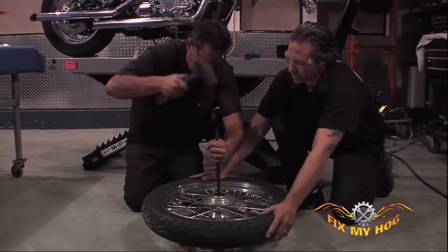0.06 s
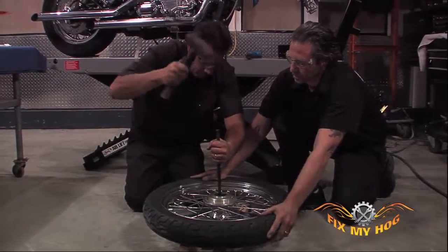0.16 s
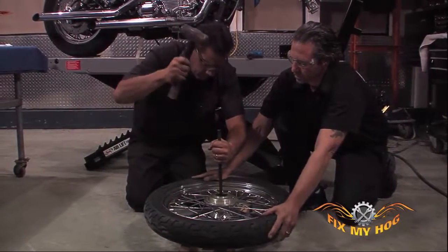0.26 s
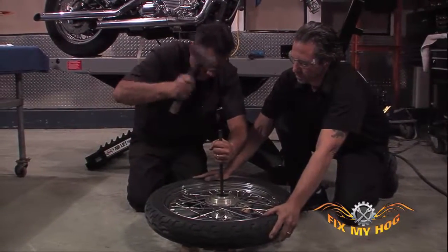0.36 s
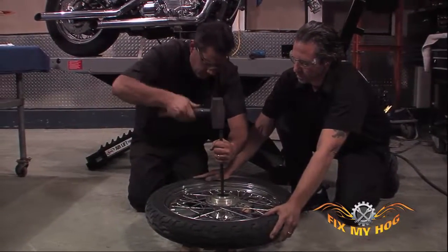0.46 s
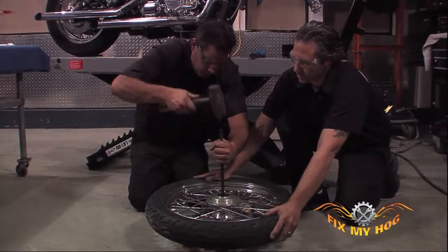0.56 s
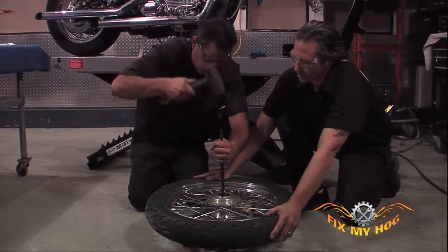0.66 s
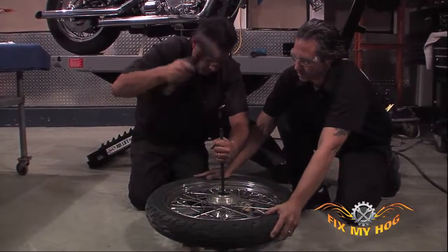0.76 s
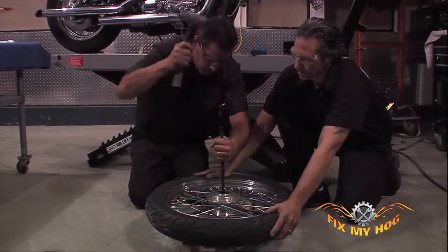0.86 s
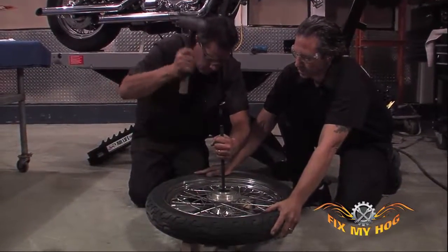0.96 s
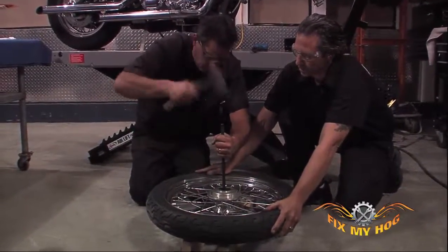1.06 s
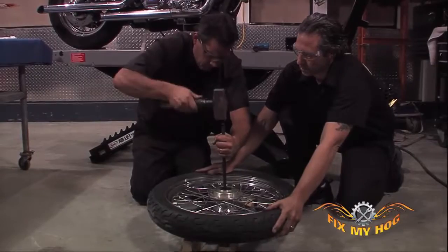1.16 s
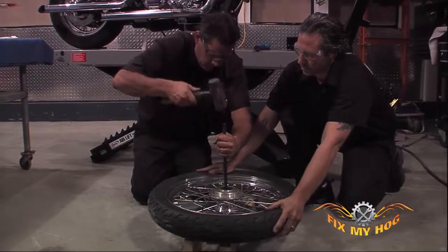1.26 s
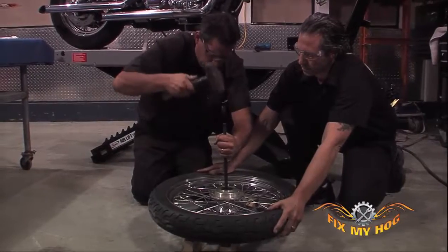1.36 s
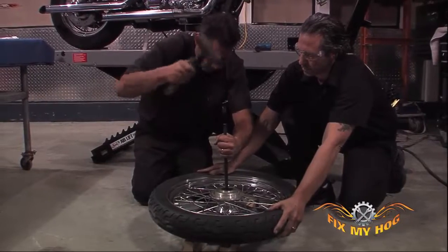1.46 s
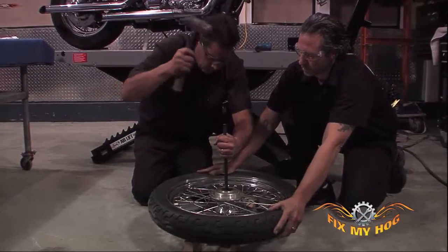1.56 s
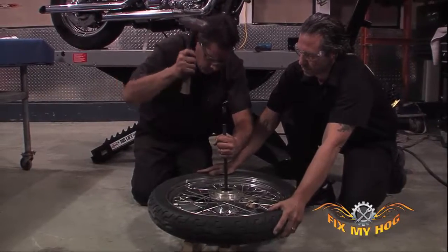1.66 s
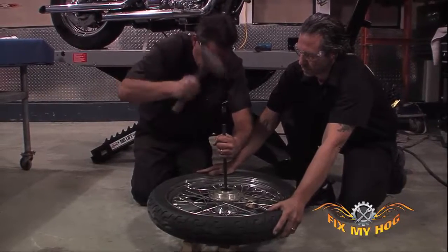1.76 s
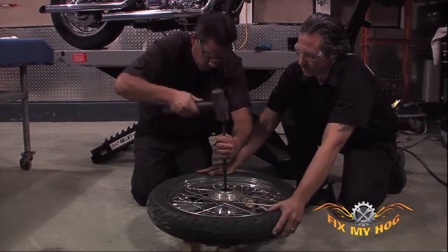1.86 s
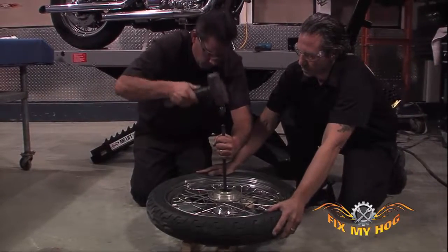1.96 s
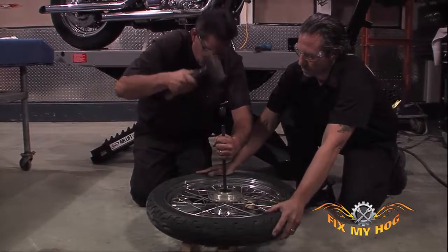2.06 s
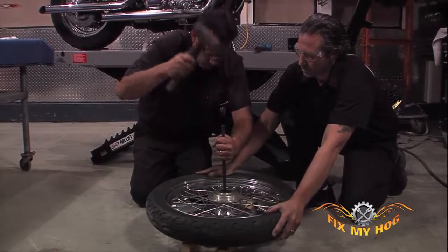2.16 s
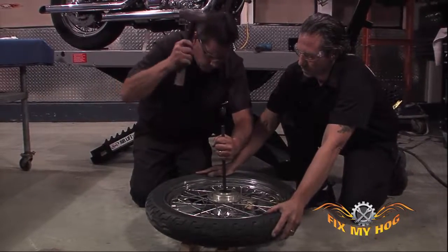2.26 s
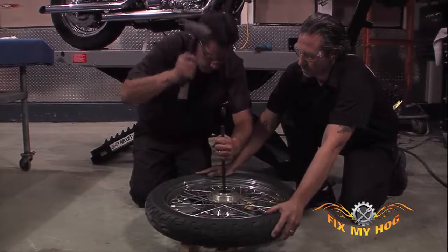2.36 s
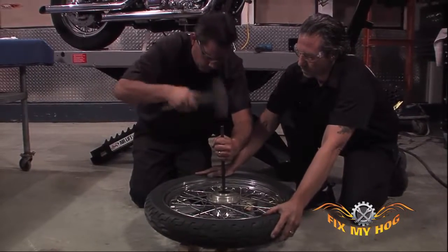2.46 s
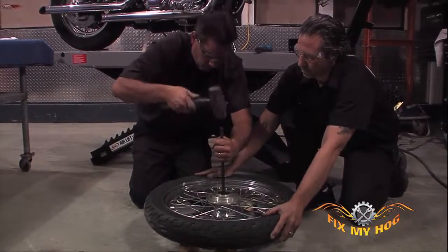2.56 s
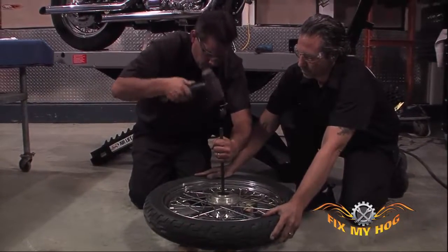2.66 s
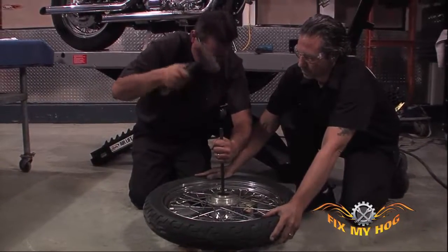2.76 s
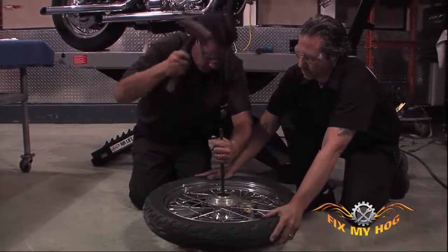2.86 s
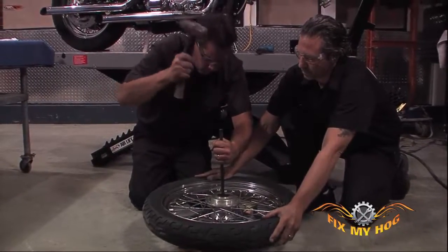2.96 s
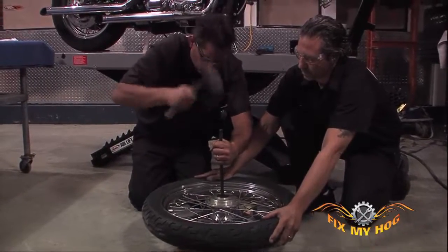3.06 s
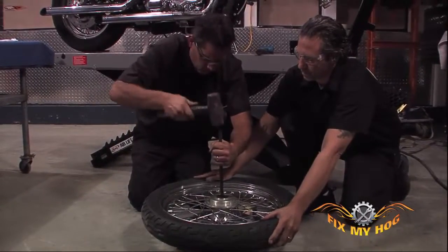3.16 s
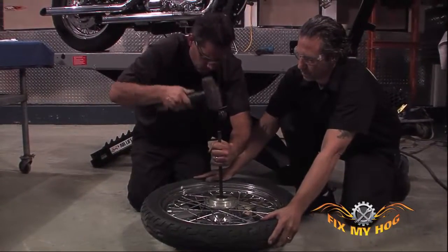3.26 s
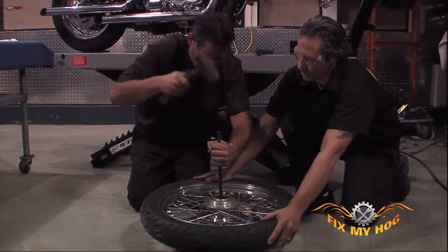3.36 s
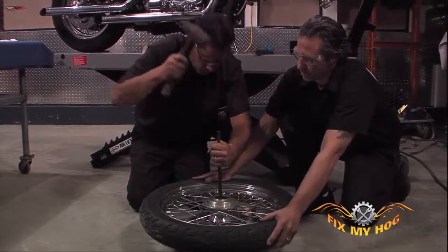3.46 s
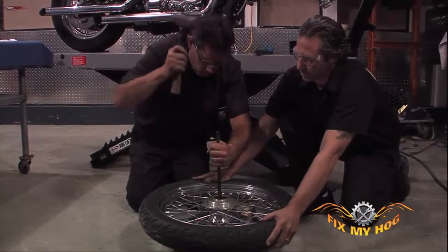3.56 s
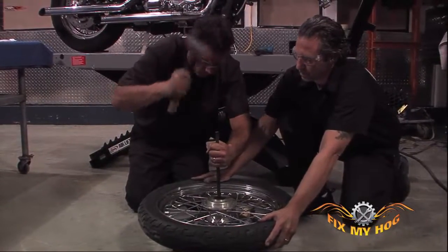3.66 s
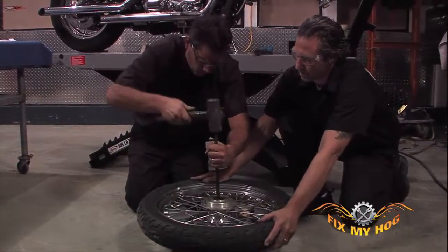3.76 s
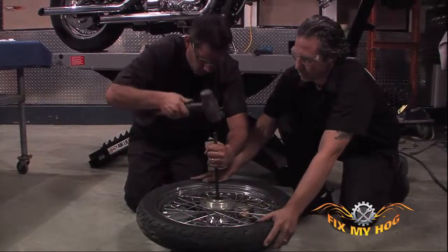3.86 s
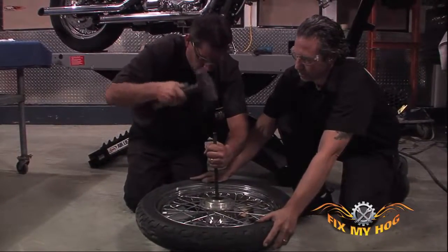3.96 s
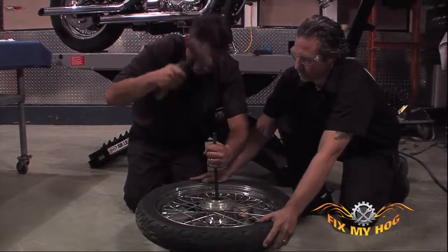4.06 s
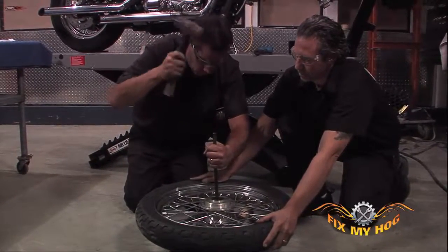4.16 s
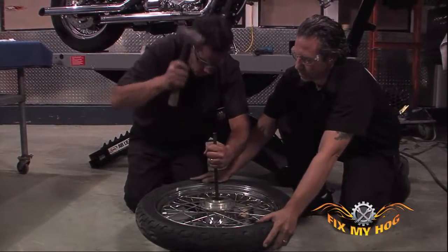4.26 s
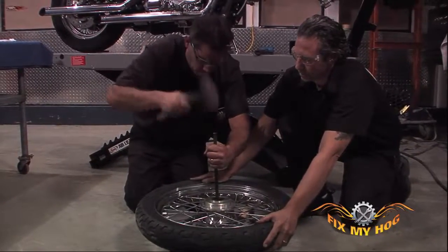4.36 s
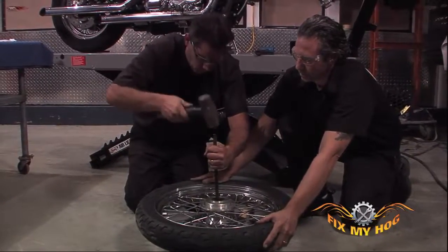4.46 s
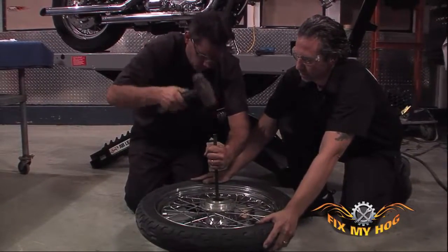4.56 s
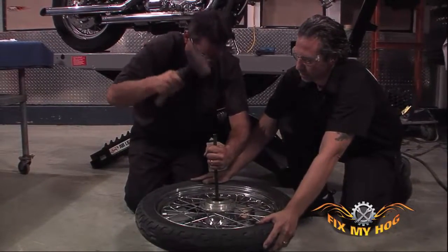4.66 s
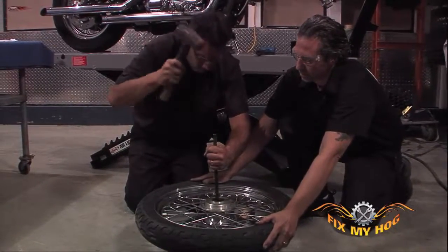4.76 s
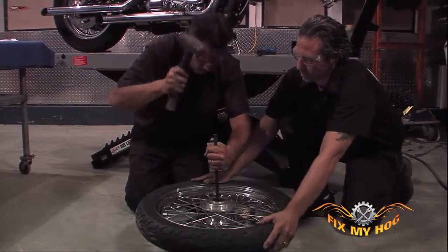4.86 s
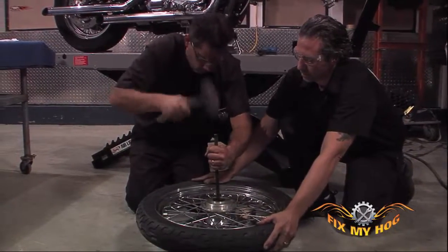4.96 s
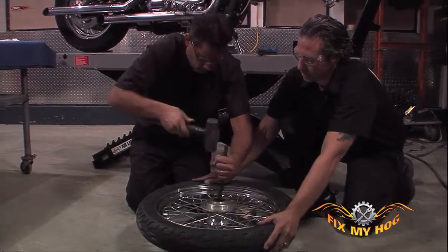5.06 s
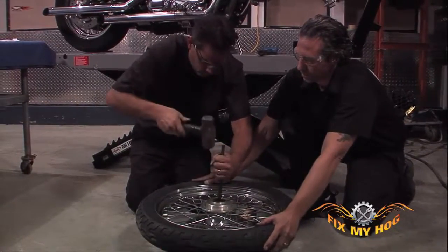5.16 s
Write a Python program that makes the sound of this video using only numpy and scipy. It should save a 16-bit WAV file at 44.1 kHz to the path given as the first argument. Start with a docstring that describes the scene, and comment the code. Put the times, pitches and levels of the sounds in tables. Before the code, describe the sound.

Evenly spaced sharp metal hammer blows with short rattle and thin ringing in a reverberant garage, the last two weaker as the part comes loose.

```python
"""Hammering a bearing out of a wheel

A hammer drives a steel bearing remover into the hub of a spoked wheel lying on a workshop floor.
Each blow is a noise crack, decaying noise clatter and damped modes of wheel and rod, with singing spokes.
The rod's modes change as the bearing slips and comes free; the rod then drops with a second, dull knock.
The hall adds a wall echo and a diffuse tail, over a faint ventilation drone of coloured noise."""
import sys
import numpy as np
from scipy import signal
from scipy.fft import rfft, irfft, next_fast_len
from scipy.io import wavfile

SR = 44100
rng = np.random.default_rng(int(sys.argv[2]) if len(sys.argv) > 2 else 0)


def wrap_up_sound(samples):
    """Save the sound to the file named by the first command line argument, as 16-bit audio."""
    columns = np.atleast_2d(samples).T
    # keep every value between -1 and 1, then stretch to whole-number steps
    tamed = np.clip(columns, -1, 1)
    steps = np.round(tamed * 32767).astype(np.int16)
    wavfile.write(sys.argv[1], SR, steps)


N = 229871  # samples
TOP_HZ = 10450  # upper band limit of the crack and of the recorder

# hammer blows: start_s, level_db, hollow_knock_db, spoke_song_db, seat (how the rod sits)
BLOWS = [(-.15, -0.5, 3, -7, "wedged"), (0.4913, 1, 2.5, -6.5, "wedged"), (1.1363, 2, -4.5, -2, "wedged"),
         (1.871, 0, 4, -3, "wedged"), (2.5194, .5, -2, -10.5, "wedged"), (3.1506, .5, 0, 3, "wedged"),
         (3.7914, -1, 2, 2.5, "wedged"), (4.4381, -3.5, -1, 0.5, "slipping"), (5.0325, -6, -2, 2.5, "free")]


def hammering():
    """Superposition of impulse responses: every blow excites wheel, rod and spokes, then the hall."""
    # modes of the rod for each seat: pitch_hz, level_db (relative), t60_s, swell_s
    wedged_modes = [(3440, -7, .15, .004), (4366, -10, .1, .004), (4522, -8, .1, .004),
                    (5060, 1, .08, .008), (5591, 27, .072, .045), (5578, -21, .65, .02),
                    (6794, 9, .08, .013), (8157, -4, .09, .006), (9970, -8, .08, .003)]
    slipping_modes = [(581, 2, .14, .003), (643, -9, .5, .003), (2546, -2, .13, .003),
                      (3295, -2, .15, .003), (3310, -12, .5, .003), (9577, -2, .08, .002)]
    free_modes = [(2164, 1, .14, .002), (2471, -4, .14, .002), (3470, 17, .045, .003), (3448, 2, .42, .004),
                  (3479, -2, .4, .004), (5017, -9, .15, .002), (8161, -16, .25, .002),
                  (8931, -13, .15, .002), (9970, 0, .08, .002)]
    # how loose the rod sits, by seat: looseness (0 tight, 1 free)
    looseness = {"wedged": 0, "slipping": .55, "free": 1}
    rod_modes = {"wedged": wedged_modes, "slipping": slipping_modes, "free": free_modes}
    rod_db = -23.5
    shortening = 0.27  # share of the clatter's length that a free rod loses

    # a second of lead-in holds the first blow, which is already dying away at the start
    out = np.zeros(N + 2 * SR)
    t = np.arange(SR) / SR
    for start_s, level_db, knock_db, song_db, seat in BLOWS:
        loose = looseness[seat]
        colour = blow_colour(start_s, knock_db, loose)
        knock = wheel(*colour, length=1 - shortening * loose)
        rod = amp(rod_db) * ring(rod_modes[seat], t)
        song = spokes(song_db, t)
        # the rod's thin ring fills the hall less than the wheel's knock does
        echoes = hall(knock + amp(-6) * rod)
        start = round((start_s + 1) * SR)
        out[start:start + SR] += amp(level_db) * (knock + rod + song + echoes)
    return out[SR:SR + N]


def blow_colour(start_s, knock_db, loose):
    """Contact and seating set the spectral balance: boom, thud, knock, clang and treble in dB."""
    # a hollow blow also booms more, by 0.65 dB per dB of knock
    boom_db = -1 + 0.65 * knock_db + 7 * loose
    thud_db = 2 - 5.5 * loose
    clang_db = 0.7
    # the blows brighten by 1.43 dB per second as the bearing is driven out
    treble_db = -1.23 + 1.43 * start_s - 0.5 * loose
    return boom_db, thud_db, knock_db, clang_db, treble_db


def wheel(boom_db, thud_db, knock_db, clang_db, treble_db, length):
    """Impact excitation of a built-up structure: a crack, dense clatter and modes of hub and rim, for 1 s."""
    # dense clatter of spokes and hub: frequency_hz, density_db (per Hz, relative)
    clatter_spectrum = [(25, -21.5), (100, -18), (250, -12), (450, -3), (780, -1), (1300, -7.5), (2000, -5),
                        (3000, -11), (4400, -13), (6000, -16), (8500, -21.5), (10300, -22.5)]
    # decay of the clatter at length 1: frequency_hz, t60_s
    clatter_decay = [(100, 0.18), (700, 0.19), (2000, 0.23), (5000, 0.15), (10000, 0.043)]
    # modes of hub and rim: pitch_hz, level_db (relative), t60_s
    wheel_modes = [(468, -11, .25), (528, -10, .25), (554, -10, .3), (646, -14, .25), (725, -3, .12),
                   (781, -4, .12), (856, -5, .12), (1080, -6, .12), (1420, -6, .11), (1686, -8, .1),
                   (1855, -6, .1), (1997, -10, .22), (2552, -7, .13), (3101, -13, .12)]

    t = np.arange(SR) / SR
    t60s = [(hz, length * t60) for hz, t60 in clatter_decay]
    dense = noise(lambda hz: amp(along(clatter_spectrum, hz)), SR)
    clatter = amp(-14.5) * dying(dense, t60s)
    # loose contacts chatter, so the clatter comes in bursts a few milliseconds long
    chatter_db = 1.8 * noise(lambda hz: (hz > 40) & (hz < 200), SR)
    clatter *= amp(chatter_db)
    body = clatter + amp(-24) * length * ring(wheel_modes, t)

    # how squarely the hammer lands sets the colour
    colour = [(100, 0.0024), (350, boom_db), (680, thud_db),
              (1080, knock_db), (2000, clang_db), (7500, treble_db)]
    body = filtered(body, lambda hz: amp(along(colour, hz)))

    # steel on steel: a few milliseconds of bright crack
    bright = noise(lambda hz: (hz < TOP_HZ) * hz / (hz + 1200), SR)
    crack = amp(-28.5 + treble_db) * bright * np.exp(-(t / 0.0049) ** 2)
    onset = 1 - np.exp(-t / 0.00058)
    return (body + crack) * onset


def ring(modes, t):
    """Modal synthesis: damped sines of slightly new strength each time; a swell time makes a mode build up."""
    pitch_hz, level_db, t60_s, *swell_s = np.transpose(modes)[:, :, None]
    rise = 1 - np.exp(-(t / swell_s[0]) ** 2) if swell_s else 1
    strength_db = level_db + 1.5 * rng.standard_normal(pitch_hz.shape)
    envelope = amp(strength_db - 60 * t / t60_s) * rise
    phase = rng.random(pitch_hz.shape)  # cycles
    return np.sum(envelope * np.sin(2 * np.pi * (pitch_hz * t + phase)), axis=0)


def spokes(song_db, t):
    """Near-degenerate resonators: the spokes, all nearly alike, sing on together after the rod has stopped."""
    decay = amp(song_db - 40.5 - 60 * t / 0.6)  # t60 0.6 s
    rise = 1 - np.exp(-t / 0.0041)
    return decay * rise * band(6810, 120, SR)


def drop():
    """A weaker, softer impact excites less treble: the freed rod lands with one short, dull knock."""
    # colour of the drop by band: boom_db, thud_db, knock_db, clang_db, treble_db
    drop_colour = dict(boom_db=6.5, thud_db=-4, knock_db=-0.5, clang_db=-4.5, treble_db=-11)
    delay_s, level_db = 0.019, -1  # the delay counts from the last blow
    knock = amp(level_db) * wheel(**drop_colour, length=0.3)
    start = round((BLOWS[-1][0] + delay_s) * SR)
    return np.pad(knock + hall(knock), (start, 0))[:N]


def hall(x):
    """Room acoustics: a near wall's delayed reflection, then a diffuse tail by convolution with dying noise."""
    # reverberation of the workshop: frequency_hz, t60_s
    hall_decay = [(100, 0.7), (550, 0.6121), (1200, 0.68), (2500, 0.61), (5000, 0.7141), (7000, .5),
                  (10000, 0.5)]
    # strength of its answer: frequency_hz, level_db
    hall_response = [(60, -9.5), (250, -8.5), (550, -1.5), (1000, -10), (2200, -10), (4000, -10.5),
                     (5600, -17.5), (6900, -8.5), (10000, -11.5)]
    t = np.arange(SR) / SR
    build_up = 1 - np.exp(-(t / 0.017) ** 2)
    tail = dying(rng.standard_normal(SR), hall_decay) * build_up
    tail = filtered(tail / np.linalg.norm(tail), lambda hz: amp(along(hall_response, hz)))

    def reflection(hz):
        """Delay as linear phase, 21 ms, with a first-order loss of treble above 3 kHz."""
        return amp(-15.5) * np.exp(-2j * np.pi * hz * 0.021) / (1 + 1j * hz / 3000)

    wall = filtered(x, reflection)
    return wall + signal.fftconvolve(x, tail)[:len(x)]


def ventilation():
    """Broadband flow noise with resonant amplification: steady air and a few narrow duct resonances."""
    # air noise: frequency_hz, density_db (per Hz, relative)
    air_spectrum = [(15, -52.5), (25, -28), (102, -14.5), (156, -15.5), (384, -11.5), (447, -17),
                    (574, -2.5), (634, -6.5), (701, -13.5), (1640, -27), (2010, -25), (3670, -34),
                    (10000, -45), (13000, -76.5), (22000, -120)]
    # duct resonances: centre_hz, width_hz, level_db
    duct_resonances = [(112, 5, -75.5), (556.3, 21, -65.5), (537, 27, -62), (607.4, 19, -65)]
    air = amp(-63.5) * noise(lambda hz: amp(along(air_spectrum, hz)), N)
    return air + sum(amp(db) * band(centre, width, N) for centre, width, db in duct_resonances)


def band(centre_hz, width_hz, size):
    """A crowd of close resonances acts as narrow-band noise with a Lorentzian-like peak, here of rms 1."""
    return noise(lambda hz: 1 / (1 + 2 * ((hz - centre_hz) / width_hz) ** 2), size)


def noise(response, size):
    """Spectral shaping: white noise through a frequency response, at rms 1."""
    return unit(filtered(rng.standard_normal(size), response))


def dying(x, t60s):
    """Frequency-dependent damping: each band of x decays exponentially at its own t60."""
    hz, t, spectrum = signal.stft(x, SR, nperseg=256)
    decay = amp(-60 * t / along(t60s, hz)[:, None])
    return signal.istft(spectrum * decay, SR)[1][:len(x)]


def filtered(x, response):
    """Linear filtering: the spectrum of x times a response of frequency, zero-padded by half a second."""
    size = next_fast_len(len(x) + SR // 2)
    spectrum = rfft(x, size) * response(np.fft.rfftfreq(size, 1 / SR))
    return irfft(spectrum, size)[:len(x)]


def along(points, hz):
    """Interpolation on a logarithmic frequency axis through (frequency, value) points."""
    point_hz, values = np.transpose(points)
    return np.interp(np.log(hz + 1), np.log(point_hz), values)


def unit(x):
    """Normalisation by the root mean square, to rms 1."""
    return x / np.sqrt(np.mean(x ** 2) + 1e-20)


def amp(db):
    """The decibel law: 20 dB is a factor of ten in amplitude."""
    return 10 ** (np.asarray(db) / 20)


def scene():
    """Linear superposition of the hammering, the rod's drop and the drone."""
    return (hammering() + drop() + ventilation())[None]


def record(dry):
    """Saturation and band limiting: the recorder rounds off high peaks and cuts steeply above its limit."""
    ceiling = amp(-5.8)
    rounded = dry[0] / (1 + (dry[0] / ceiling) ** 4) ** (1 / 4)
    return filtered(rounded, lambda hz: 1 / np.sqrt(1 + (hz / TOP_HZ) ** 200))[None]


dry = scene()
out = record(dry)
wrap_up_sound(out)
```